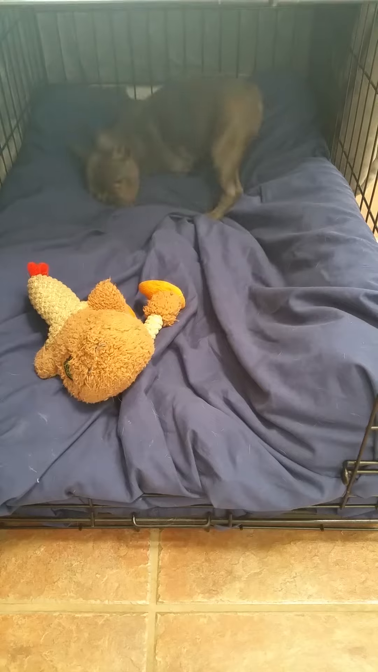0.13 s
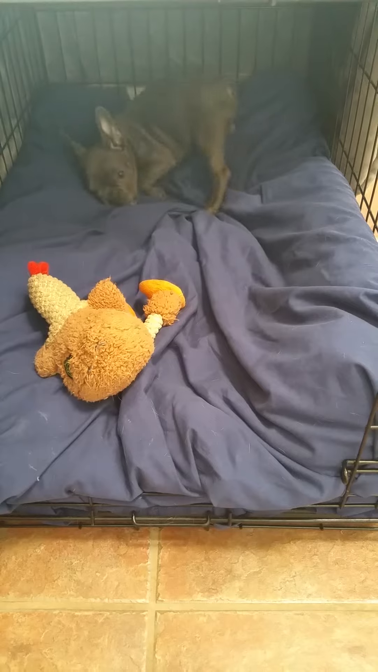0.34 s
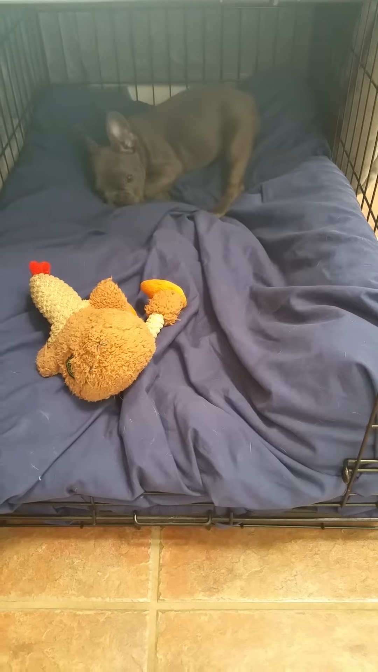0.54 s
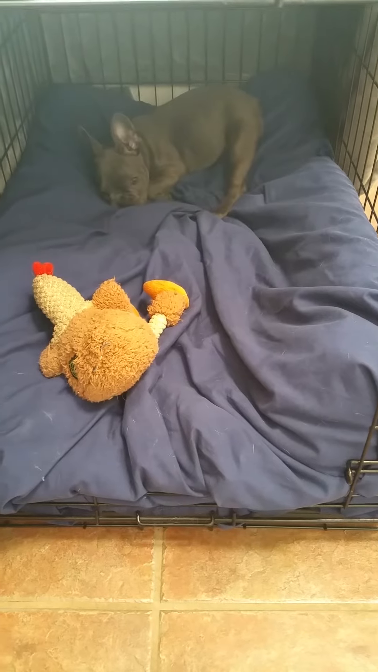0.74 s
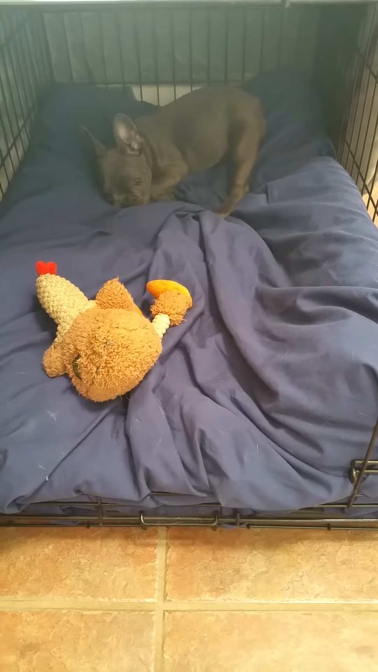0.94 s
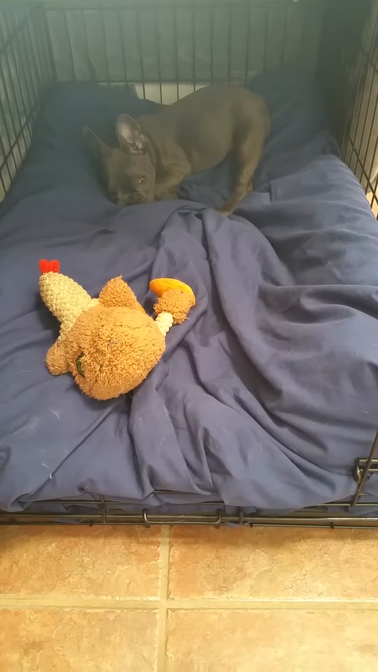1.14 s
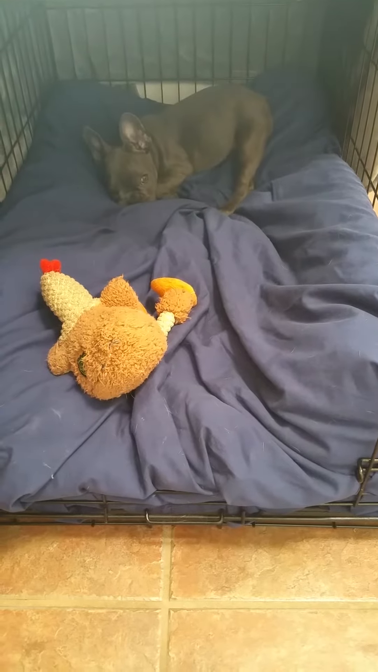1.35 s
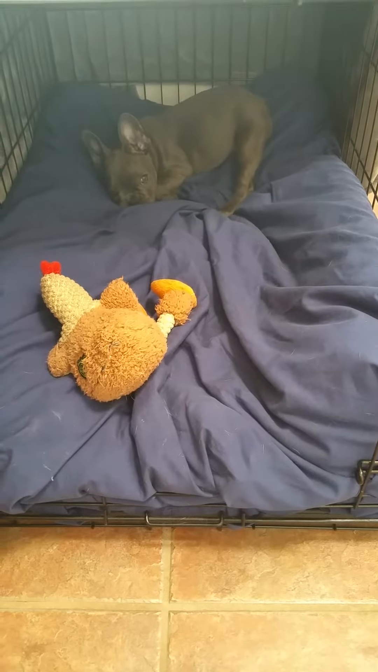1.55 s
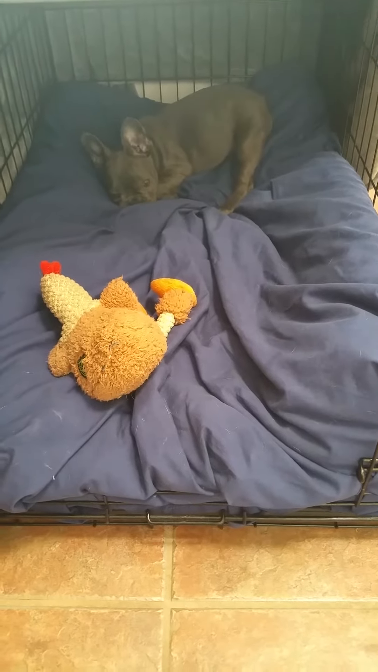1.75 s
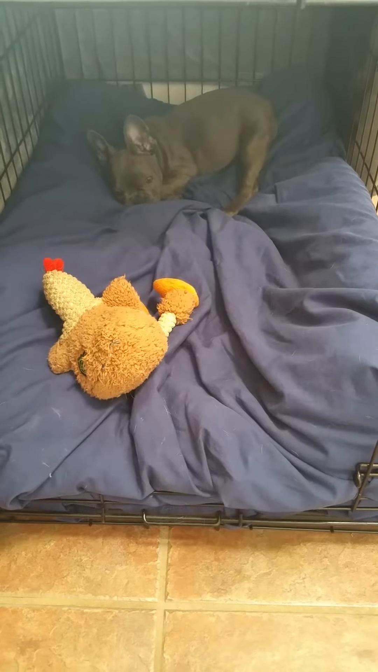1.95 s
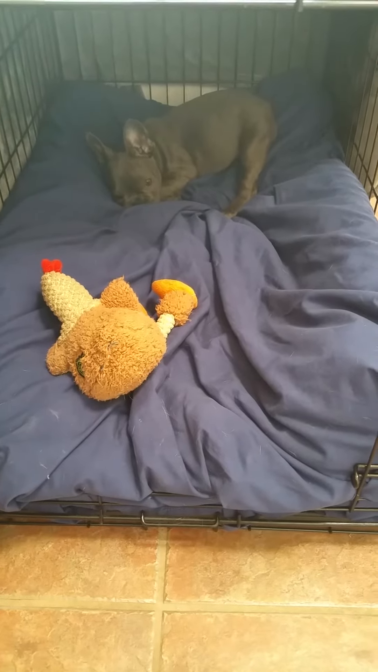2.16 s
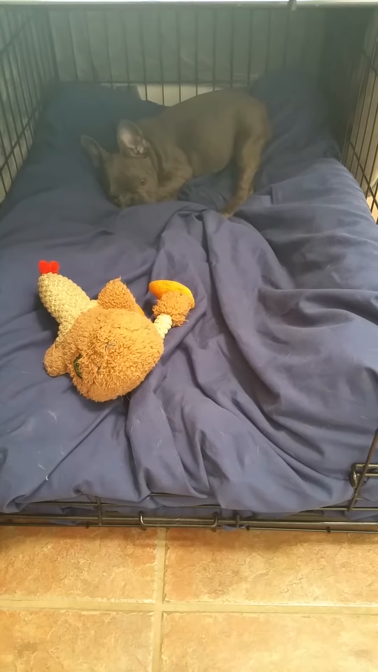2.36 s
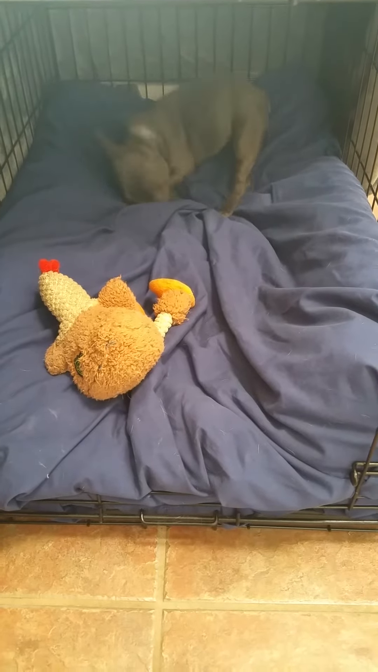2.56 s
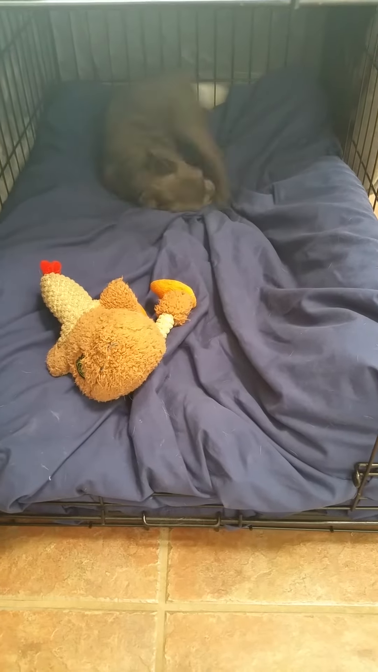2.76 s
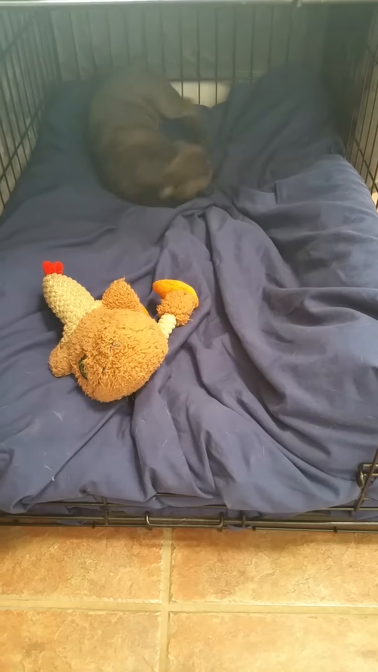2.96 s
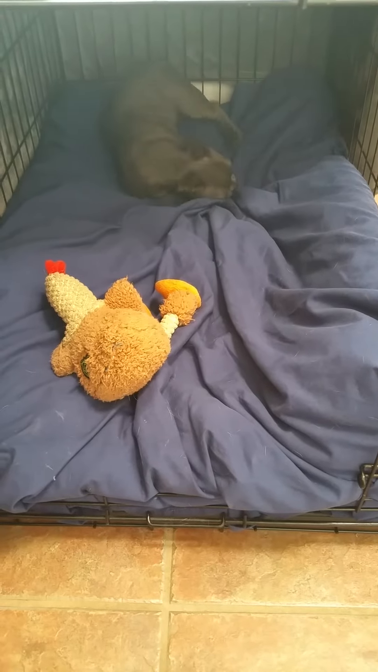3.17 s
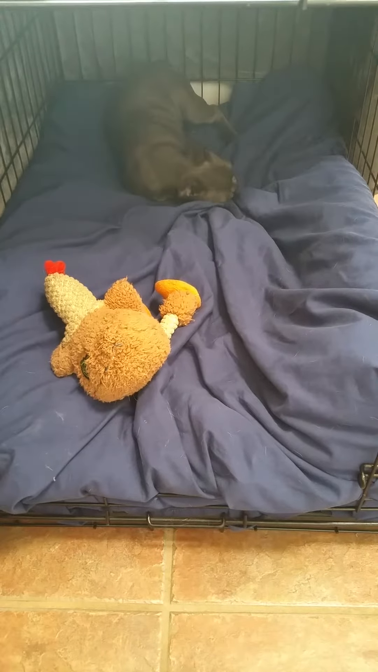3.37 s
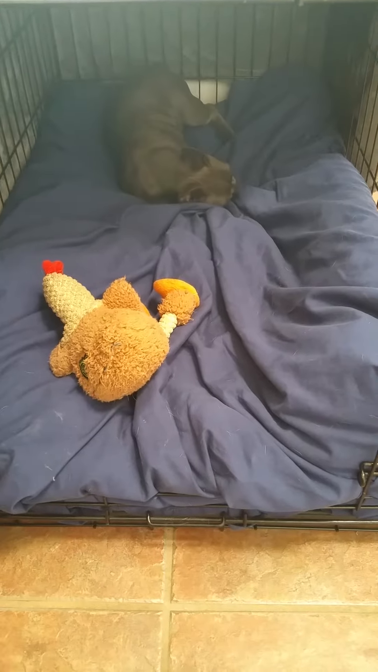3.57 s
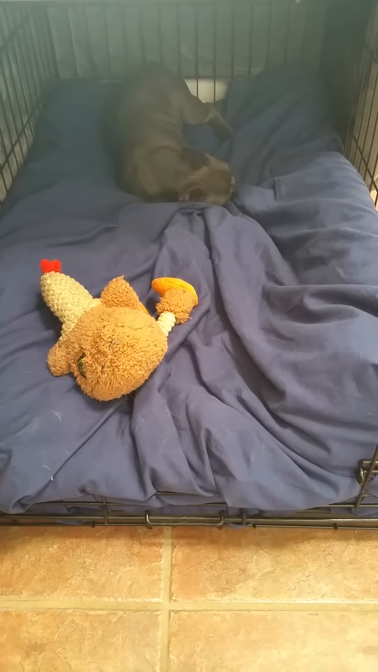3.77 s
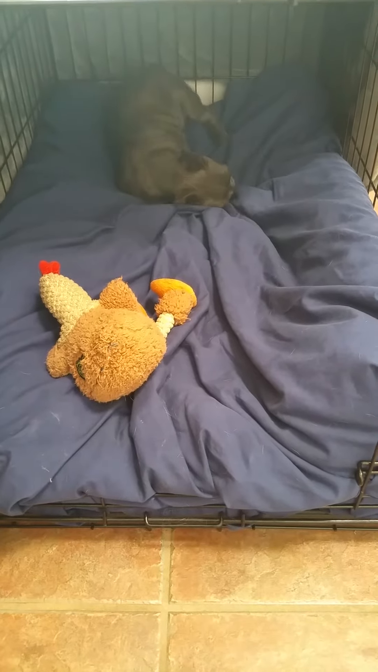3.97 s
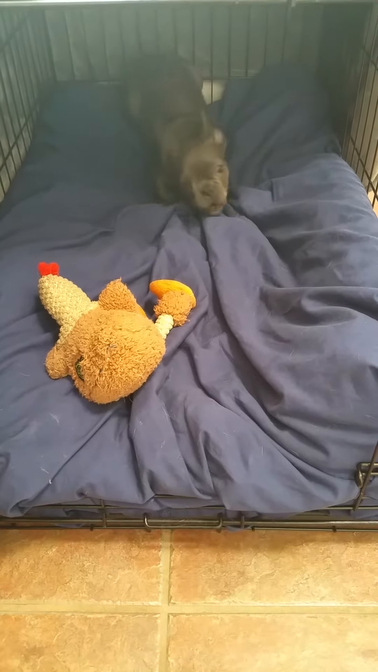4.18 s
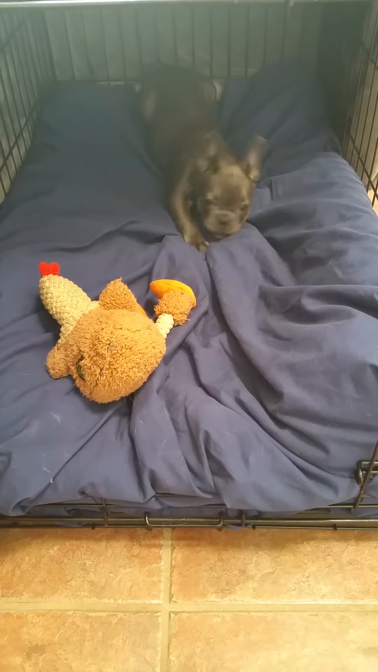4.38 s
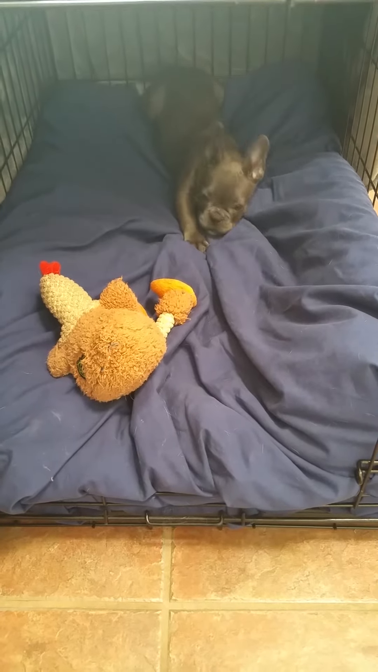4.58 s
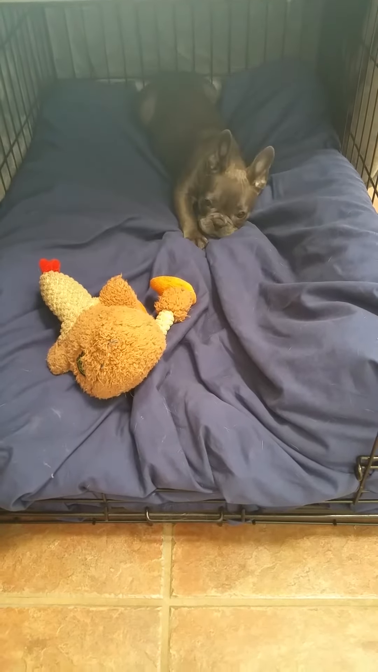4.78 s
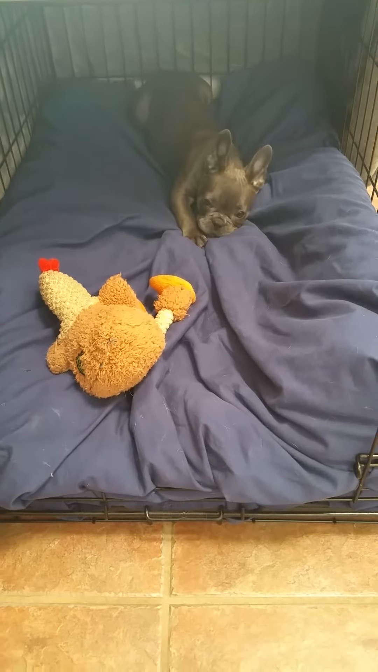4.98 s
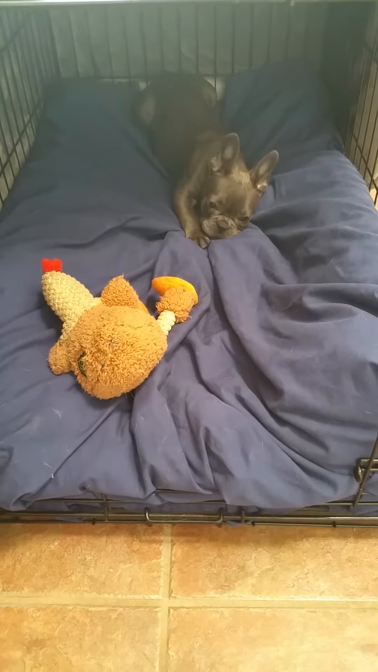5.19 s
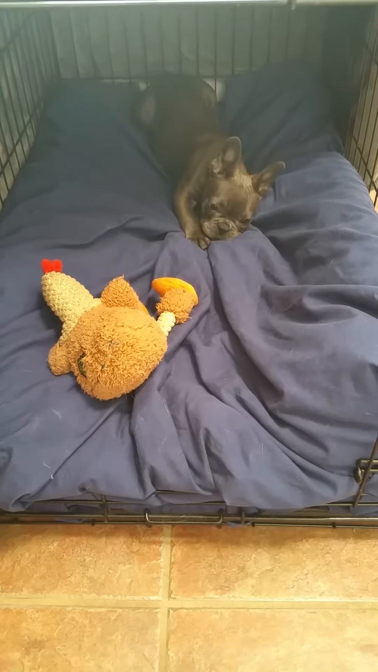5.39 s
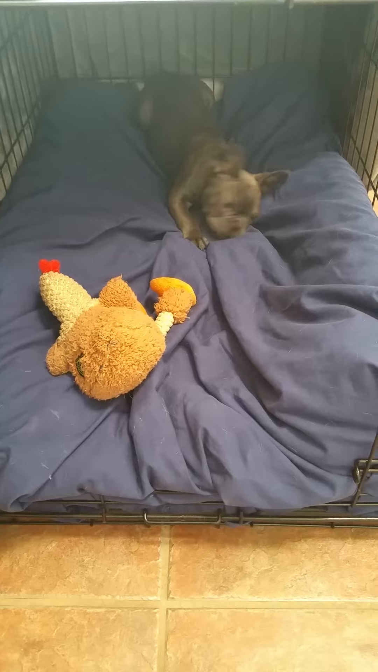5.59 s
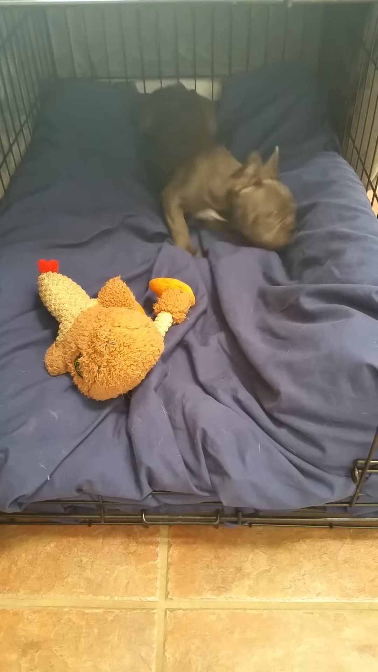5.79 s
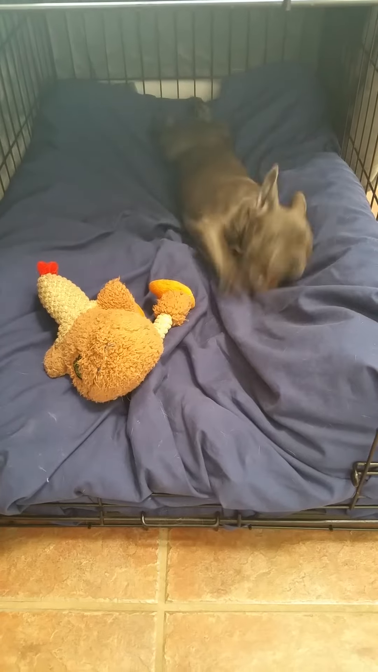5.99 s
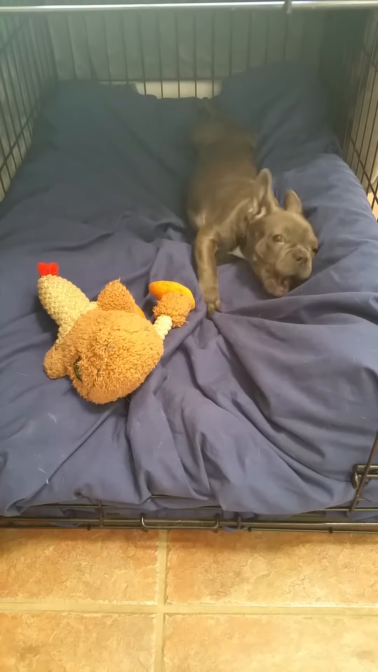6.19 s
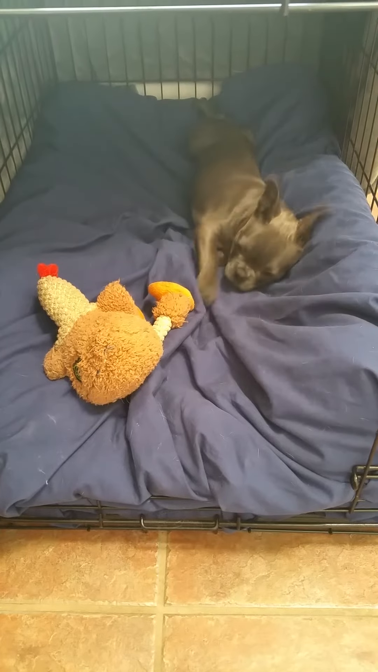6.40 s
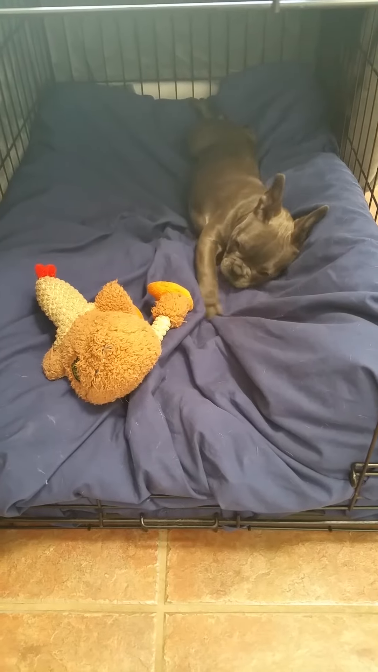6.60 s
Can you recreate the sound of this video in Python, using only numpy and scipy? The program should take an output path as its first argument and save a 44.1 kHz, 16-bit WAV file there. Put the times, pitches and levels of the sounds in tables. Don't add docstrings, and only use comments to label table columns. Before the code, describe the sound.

A close stereo pickup in a hard tiled room, with soft air and a low motor hum near 118 Hz that eases by 4.5 s and strengthens at the end. At 0.1 s a small dog lands on the hollow crate tray on the right: a strong thump, click and brief claw scrape, with cloth rustle. From 0.5 s it is to the left, quiet, with faint rustles, paw ticks and sniffs near 1.2 and 2.1 s. A thin distant cricket pulses from 2 s. At 2.5 s comes a short, loud, bright bark turning hoarse, with a brief tiled echo. Bumps and rustles follow around 2.7 and 3.2 s. At 4.13 s a second bark, thinner and rougher, then a thump at 4.4 s. A lull holds sparse ticks and a cricket chirp at 5.3 s. From 5.7 s vigorous burrowing: blanket rustle, tray thuds, wire scrapes and a hissy breath, thinning to small bumps by 6.6 s.

```python
import sys
import numpy as np
from scipy import signal
from scipy.fft import rfft, irfft
from scipy.io import wavfile
from scipy.ndimage import uniform_filter1d, minimum_filter1d

SR = 44100
rng = np.random.default_rng(int(sys.argv[2]) if len(sys.argv) > 2 else 0)


def persist_wave(psi):
    counts = np.round(np.clip(psi, -1, 1) * 32767).astype(np.int16)
    wavfile.write(sys.argv[1], SR, np.atleast_2d(counts).T)


def undo_db(level):
    steps = np.asarray(level, float) / 20
    return 10 ** steps


N = 293265


def rms_one(x):
    return x / np.sqrt(np.mean(x ** 2) + 1e-20)


def at_hz(points, hz):
    points = np.array(points)
    return np.interp(np.log(np.maximum(hz, 1)), np.log(points[:, 0]), points[:, 1])


def shaped(x, gain_at):
    size = x.shape[-1]
    return irfft(rfft(x) * gain_at(np.fft.rfftfreq(size, 1 / SR)), size)


def noise(spectrum):
    return rms_one(shaped(rng.standard_normal(N), lambda hz: undo_db(at_hz(spectrum, hz))))


def butter(x, order, hz, kind):
    return signal.sosfilt(signal.butter(order, hz, kind, fs=SR, output="sos"), x)


def drift(rate):
    knots = np.arange(int(N / SR * rate) + 2)
    return np.interp(np.arange(N) / SR * rate, knots, rng.standard_normal(len(knots))) * 1.2


def poles(hz, width_hz):
    r = np.exp(-np.pi * width_hz / SR)
    return (1 - r * r) / 2 * np.array([1, 0, -1]), [1, -2 * r * np.cos(2 * np.pi * hz / SR), r * r]


def twice(x, hz, width_hz):
    once = signal.lfilter(*poles(hz, width_hz), x)
    return signal.lfilter(*poles(hz, width_hz), once)


def moving_resonance(x, hz, width_hz):
    out, state = np.zeros_like(x), np.zeros(2)
    for i in range(0, len(x), 32):
        out[i:i + 32], state = signal.lfilter(*poles(hz[i], width_hz), x[i:i + 32], zi=state)
    return out


def bouts(rows, column, rise_db_s, fall_db_s):
    t, power = np.arange(N) / SR, 0
    for row in rows:
        start, end = row[0], row[0] + row[1]
        below_db = rise_db_s * np.maximum(start - t, 0) + fall_db_s * np.maximum(t - end, 0)
        power = power + undo_db(2 * (row[column] - below_db))
    return np.sqrt(power)


def room_air(load):
    # frequency in Hz, level in dB per Hz.
    air = [(20, -13.5), (45, -15.5), (90, -12.5), (200, -18.5), (400, -22), (1000, -27.5), (3000, -33.5),
           (8000, -37), (12000, -35), (16000, -37)]
    # frequency in Hz, left-right correlation from -1 to 1.
    likeness = [(60, 0.57), (180, 0.74), (550, 0.09), (1650, 0.03), (4970, -0.09), (15000, -0.03)]
    mid = shaped(noise(air), lambda hz: np.sqrt(1 + np.clip(at_hz(likeness, hz), -1, 1)))
    side = shaped(noise(air), lambda hz: np.sqrt(1 - np.clip(at_hz(likeness, hz), -1, 1)))
    rumble = butter(mid, 2, 300, "low")
    return undo_db(-72) * (mid + (load - 1) * rumble + side * [[1], [-1]])


def appliance_hum(load):
    # partial in Hz, level in dB rms.
    partials = [
        (118.4, -70.5),
        (236.9, -84.5),
    ]
    t, hum = np.arange(N) / SR, 0
    for hz, db in partials:
        level = np.sqrt(2) * undo_db(db + 1.9 * drift(40))
        hum = hum + level * np.sin(2 * np.pi * hz * t + .5 * drift(2.8))
    return load * hum


def background():
    # time in seconds, level change in dB.
    load_curve = [
        (0, 1.5),
        (2.0, 2),
        (3.4, 1),
        (4.5, -1.5),
        (5.5, -0.5),
        (6.65, 3.5),
    ]
    load = undo_db(np.interp(np.arange(N) / SR, *np.transpose(load_curve)))
    return appliance_hum(load) + room_air(load)


def cricket():
    # start in seconds, hold in seconds, level in dB.
    chirps = [
        (1.99, .43, -83),
        (3.0, .3, -82.5),
        (3.4, .12, -79.5),
        (3.77, .03, -88),
        (4.06, .04, -78.5),
        (5.19, 0.11, -84.5),
        (5.34, 0.24, -76),
    ]
    wing_hz, edge_db_s = 4103, 139
    tone = signal.lfilter(*poles(wing_hz, 120), rng.standard_normal((2, N)))
    tone = signal.lfilter(*poles(wing_hz, 110), tone)
    pulses = 0.68 + np.sin(np.pi * 27 * np.arange(N) / SR) ** 2
    port_gain = undo_db([[3.], [1.]])
    return bouts(chirps, 2, edge_db_s, edge_db_s) * rms_one(tone * pulses) * port_gain


def burrowing():
    # start in seconds, hold in seconds, blanket level in dB, tray level in dB.
    moves = [(0.0, .23, -60.5, -59), (.5, .08, -77, -70.5), (1.14, 0.18, -71.5, -80),
             (1.57, 0.99, -78, -84), (2.05, .1, -72.5, -78), (2.4, .1, -76.5, -73.5),
             (2.62, 0.2, -72.5, -55), (3.1, .1, -67.5, -84), (3.97, .2, -69, -70.5),
             (4.29, .12, -75.5, -59), (5.5, .08, -76, -81.5), (5.685, 0.04, -60, -69),
             (5.84, 0.28, -57, -58), (6.25, .12, -71.5, -70.5)]
    # frequency in Hz, level in dB per Hz.
    fibres = [(150, -46.5), (250, -16.5), (829, -10), (1040, -16.5), (1320, -17), (1560, -15),
              (6590, -29.5), (8520, -36.5), (15000, -37.5)]
    rise_db_s, cloth_fall_db_s, tray_fall_db_s = 495, 40, 150.5
    slips = rng.random(N) < 2000 / SR
    grains = slips * undo_db(3 * np.minimum(rng.exponential(1, N), 4)) * rng.choice([-1, 1], N)
    cloth = shaped(grains, lambda hz: undo_db(at_hz(fibres, hz))) * undo_db(2.5 * drift(35))
    tray = butter(rng.standard_normal(N), 3, [85, 330], "band") * undo_db(3 * drift(40))
    return (bouts(moves, 2, rise_db_s, cloth_fall_db_s) * rms_one(cloth)
            + bouts(moves, 3, rise_db_s, tray_fall_db_s) * rms_one(tray))


def scrapes():
    # start in seconds, level in dB, resonance in Hz, width in Hz, 60 dB decay in seconds.
    strokes = [(.1125, -30.5, 2040, 2220, 0.073), (.1115, -37, 2778, 4900, 0.01),
               (.54, -77, 1981, 1852, 0.2), (2.061, -50, 2324, 893, 0.033), (3.21, -64, 1480, 648, 0.24),
               (3.973, -66.5, 1600, 1200, 1), (5.68, -80, 2110, 2000, 0.14), (5.711, -42, 2700, 600, 0.039),
               (5.74, -58, 2519, 600, 0.09), (5.9, -46.5, 2926, 756, 0.035),
               (5.916, -42, 3290, 648.1, .035), (5.91, -55, 1340, 600, 0.19), (6.02, -54, 1360, 600, 0.37),
               (6.045, -48, 1950, 600, 0.058)]
    out, t = np.zeros(N), np.arange(int(.4 * SR)) / SR
    onset = np.minimum(t / .003, 1)
    for s, db, hz, width_hz, t60 in strokes:
        clicks = rng.standard_normal(len(t)) * (rng.random(len(t)) < .08)
        start = int(s * SR)
        body = rms_one(twice(clicks, hz, width_hz))
        out[start:start + len(t)] += undo_db(db - 60 * t / t60) * onset * body
    return out


def knocks(events, cycles, puff_db):
    contact_s, size = 0.002, 2000
    out = np.zeros(N + SR)
    for s, db, hz in events:
        turns = np.arange(size) / SR * hz
        puff = rms_one(butter(rng.standard_normal(size), 2, [0.3 * hz, 3. * hz], "band"))
        ring = -np.sin(2 * np.pi * turns) + undo_db(puff_db) * puff * np.minimum(turns / 0.1, 1)
        start = int((s + contact_s) * SR)
        out[start:start + size] += undo_db(db) * ring * np.exp(-turns / cycles)
    return out[:N]


def thumps():
    # time in seconds, peak in dB, pitch in Hz.
    landings = [(0.009, -56, 150), (0.084, -40.5, 189), (0.1105, -21, 211.4), (0.131, -32, 142),
                (0.186, -38, 154), (0.355, -46, 176), (1.167, -66, 197), (3.132, -52, 200.7),
                (3.177, -48, 219), (3.241, -48.5, 190), (2.67, -48.5, 95.3), (4.14, -54, 120),
                (4.368, -39, 129), (4.386, -31.5, 225.4), (5.549, -59.5, 145.2), (5.714, -51, 140),
                (5.756, -43.5, 142), (5.803, -47, 154), (5.834, -35, 210), (5.961, -37, 205),
                (5.985, -37.5, 217), (6.039, -64, 221), (6.084, -41.5, 208), (6.118, -45, 142),
                (6.167, -51, 146), (6.245, -47.5, 219), (6.338, -60, 263.6), (6.423, -49.5, 207),
                (6.578, -52.5, 143.7), (6.603, -48.5, 253)]
    return knocks(landings, cycles=1.6, puff_db=-8.5)


def ticks():
    # time in seconds, peak in dB, pitch in Hz.
    contacts = [(.1101, -24, 1570), (.135, -34, 770), (.570, -56, 1010), (1.140, -56, 575),
                (1.161, -49, 546), (1.206, -60, 600), (1.757, -60, 905), (1.819, -58.5, 596),
                (1.9325, -49, 2200), (2.028, -60.5, 860), (2.0595, -43, 998), (3.218, -52, 1480),
                (4.788, -62, 700), (5.132, -48, 1903), (5.659, -44.5, 1880), (5.710, -36, 970),
                (5.834, -37.5, 983), (5.941, -54, 600), (5.986, -52, 670), (6.118, -40.5, 714),
                (6.138, -41, 765), (6.358, -56.5, 1500), (6.425, -55, 662), (6.466, -54, 970)]
    return knocks(contacts, cycles=1.5, puff_db=-4.5)


def sniffs():
    # start in seconds, length in seconds, level in dB, low resonance in Hz, hiss in dB.
    breaths = [
        (1.169, 0.19, -73, 845, 3),
        (2.06, 0.19, -68.5, 870, -17),
        (2.44, .1, -70.5, 1076, -15.5),
        (2.747, 0.043, -63.5, 1200, 7.5),
        (4.036, .07, -57, 1480, -21),
        (5.472, 0.146, -75.5, 1280, -1),
        (6.122, 0.16, -63, 975, 8.5),
    ]
    # frequency in Hz, level in dB per Hz.
    nostrils = [(1500, -29.5), (2500, -5.5), (4500, -4.5), (6300, -3.5), (8000, -11), (10000, -9),
                (13000, -11), (16000, -12)]
    t, out = np.arange(N) / SR, np.zeros(N)
    white, hiss = rng.standard_normal(N), noise(nostrils)
    for start, length, db, low_hz, hiss_db in breaths:
        end = start + length
        part = slice(int((start - .01) * SR), int((end + 0.027) * SR))
        high_gain = undo_db(.022 * (950 - low_hz))
        nose = twice(white[part], low_hz, 330) - high_gain * twice(white[part], low_hz + 1200, 740)
        rise = np.clip((t[part] - start) / 0.049 + 0.17, 0, 1)
        fall = np.clip((end - t[part]) / 0.039 + .5, 0, 1)
        out[part] += undo_db(db) * rise * fall * (rms_one(nose) + undo_db(hiss_db) * hiss[part])
    return out


def bark(rows, chest_cut_hz, high_hz, mouth_db, onset_db, onset_rough):
    # frequency in Hz, width in Hz, level in dB.
    muzzle = [
        (172.3, 160, -27.5),
        (380, 30, -22.5),
        (2464, 1000, -16.5),
        (3420, 720, -17),
        (5280, 920, -24.5),
        (7197, 900, -43.5),
        (10800, 12000, -46.5),
    ]
    throat_width_hz = 230, 290
    rows = np.array(rows)
    start = int(rows[0, 0] * SR)
    t = np.arange(start, int(rows[-1, 0] * SR)) / SR
    effort_db, low_hz, high_db = [np.interp(t, rows[:, 0], column) for column in rows.T[1:]]
    age = t - t[0]

    onset_hz, full_hz, tensing_s = 362.25, 508.7, .015
    hoarse, hoarsening_s, puff_s = .9, .075, .03
    pitch = full_hz - (full_hz - onset_hz) * np.exp(-age / tensing_s)
    rough = onset_rough + (hoarse - onset_rough) * np.minimum(age / hoarsening_s, 1)
    bright_db = mouth_db + onset_db * np.exp(-(age / puff_s) ** 2)

    chance = rng.standard_normal((200, 2))
    cycle = np.cumsum(pitch / SR).astype(int)
    phase = np.cumsum(pitch * (1 + .22 * rough * chance[cycle, 0]) / SR)
    slaps = np.diff(np.floor(phase), prepend=0) * undo_db(4 * rough * chance[cycle, 1])
    turbulence = rng.standard_normal(len(t)) * np.exp(-1.5 * (phase % 1)) * .3
    source = (slaps + rough * turbulence) / np.sqrt(1 + 3 * rough ** 2)
    source = butter(source, 4, chest_cut_hz, "high")

    gape_hz = high_hz + 355 * np.exp(-(age / .03 - 1) ** 2 * 2)
    low = moving_resonance(source, low_hz, throat_width_hz[0])
    high = moving_resonance(source, gape_hz, throat_width_hz[1])
    voice = butter(low - undo_db(high_db) * high, 2, 2400, "low")
    for hz, width_hz, db in muzzle:
        puff = rng.standard_normal(len(t)) * np.exp(-4 * (phase % 1)) * .3
        voice += undo_db(db + bright_db) * twice(puff, hz, width_hz)
    out = np.zeros(N)
    closing = np.clip((t[-1] - t) / 0.0086, 0, 1)
    out[start:start + len(t)] = undo_db(effort_db) * rms_one(voice) * closing
    return out


def barks():
    # time in seconds, effort in dB, low throat resonance in Hz (mouth opening),
    # strength of the high one in dB.
    gestures = [
        [(2.519, -49, 833, 2), (2.527, -27, 790, 2), (2.542, -20, 970, 3), (2.554, -10.5, 1470, -11),
         (2.572, -13.5, 1480, -6.5), (2.585, -12, 1320, -2), (2.6, -15.5, 1130, 5.5), (2.625, -18, 990, 3),
         (2.67, -39.5, 893, 3.5)],
        [(4.133, -37, 1360, -6.5), (4.14, -17, 1210, -1.5), (4.15, -10, 1015, 0), (4.17, -14, 1200, -7),
         (4.183, -12.5, 970, -5), (4.208, -14.5, 955, 2.5), (4.225, -17.5, 1070, -3), (4.26, -24, 896, 1),
         (4.32, -44, 870, 6)],
    ]
    # chest cut in Hz, high throat resonance in Hz, mouth brightness in dB,
    # extra onset brightness in dB, onset roughness from 0 to 1.
    colours = [
        (339.7, 2180, -8.5, 21, .08),
        (729, 1980, -4.5, -2.5, .4),
    ]
    return sum(bark(rows, *colour) for rows, colour in zip(gestures, colours))


def echoes():
    # frequency in Hz, 60 dB decay in seconds.
    room_t60 = [(100, .6), (600, 0.51), (1000, 0.37), (1600, .46), (2200, 0.43), (3500, 0.4), (6000, 0.43),
                (15000, 0.44)]
    level_db, alike_hz = 1, 300
    t, tail = np.arange(int(.7 * SR)) / SR, 0
    mid_side = rng.standard_normal((2, len(t)))
    mid_side[1] = butter(mid_side[1], 2, alike_hz, "high")
    edges = np.geomspace(40, 16000, 12)
    for low, high in zip(edges, edges[1:]):
        band = butter(mid_side, 2, [low, high], "band")
        tail = tail + band * undo_db(-60 * t / at_hz(room_t60, np.sqrt(low * high)))
    tail = tail * np.clip((t - .003) / 0.0028, 0, 1)
    return undo_db(level_db) * (tail[0] + tail[1] * [[1], [-1]]) / np.sqrt(np.sum(tail ** 2))


def room(x, sent):
    lag_samples, crossing_s = 5, .5
    direct = np.array([x, np.roll(x, lag_samples)])
    direct = np.where(np.arange(N) < crossing_s * SR, direct[::-1], direct)
    return direct + signal.fftconvolve(sent[None], echoes())[:, :N]


def microphone(near):
    # frequency in Hz, gain in dB.
    housing = [(30, -14.5), (80, -1), (160, 1.5), (7000, 1.5), (8400, -9.5), (9300, -1)]
    # frequency in Hz, left minus right in dB.
    balance = [(60, 1.0), (120, 1.0), (240, 1.0), (480, 0.5), (950, -1.0), (1890, 2.5), (3770, 1.5),
               (7520, -1.0), (15000, -7.5)]
    return shaped(near, lambda hz: undo_db(at_hz(housing, hz) + at_hz(balance, hz) * [[.5], [-.5]]))


def scene():
    far = background() + cricket()
    bed = burrowing() + scrapes() + sniffs()
    contacts = thumps() + ticks()
    dog = barks()
    sent = dog + undo_db(-3) * bed + undo_db(-6.5) * contacts
    return microphone(room(dog + bed + contacts, sent)) + far


def low_pass(x):
    return signal.sosfilt(signal.butter(12, 16440, fs=SR, output="sos"), x)


def record(dry):
    ceiling, cutoff_hz = .92, 15750
    headroom = np.minimum(1, ceiling / (np.abs(dry).max(axis=0) + 1e-9))
    gain = uniform_filter1d(minimum_filter1d(headroom, size=301), size=301)
    mix = shaped(dry * gain, lambda hz: hz < cutoff_hz)
    return low_pass(mix)


dry = scene()
out = record(dry)
persist_wave(out)
```